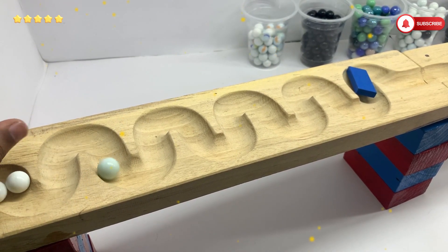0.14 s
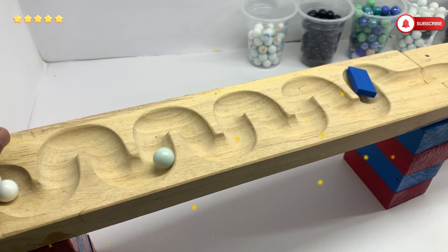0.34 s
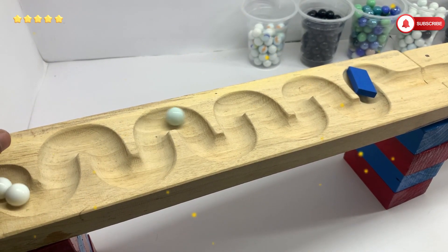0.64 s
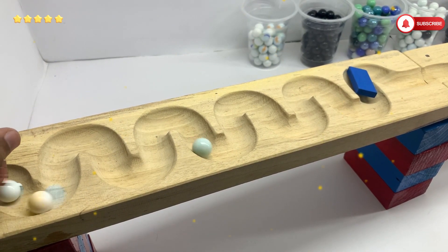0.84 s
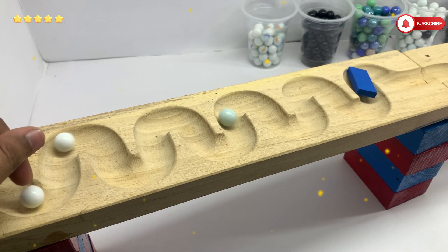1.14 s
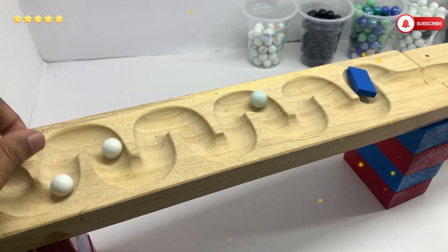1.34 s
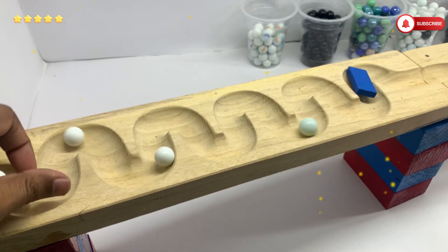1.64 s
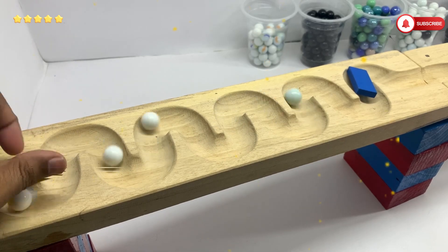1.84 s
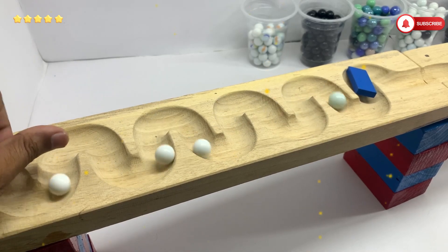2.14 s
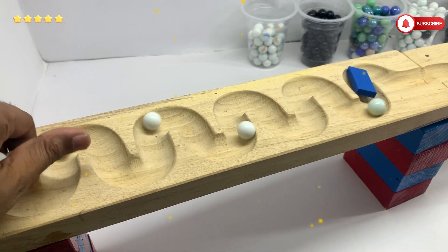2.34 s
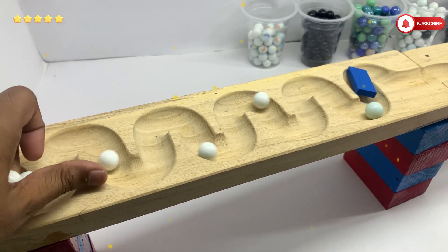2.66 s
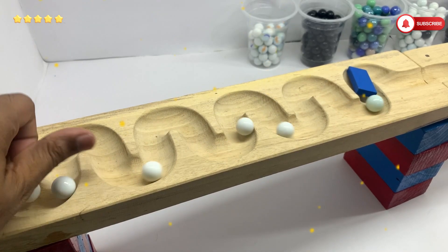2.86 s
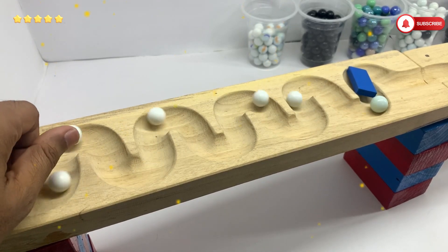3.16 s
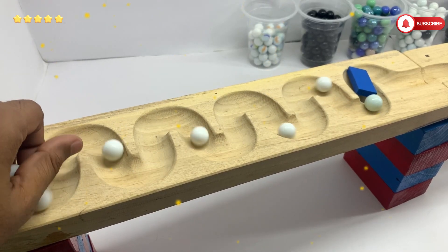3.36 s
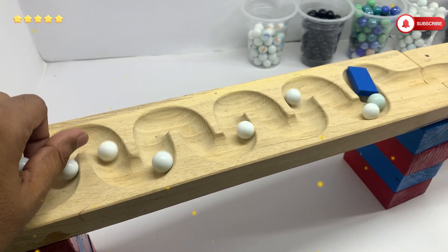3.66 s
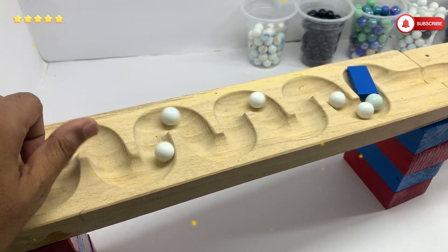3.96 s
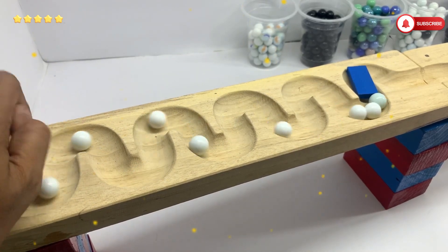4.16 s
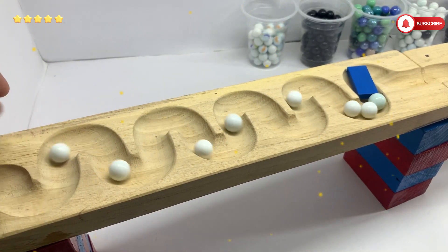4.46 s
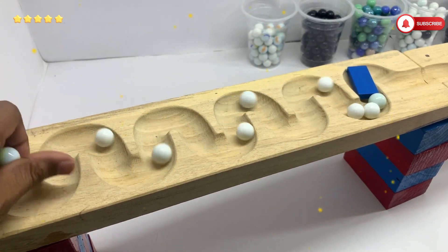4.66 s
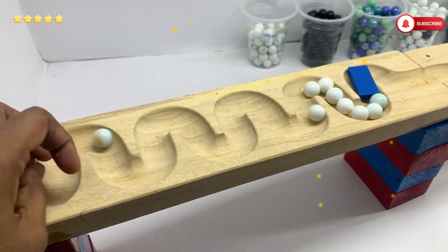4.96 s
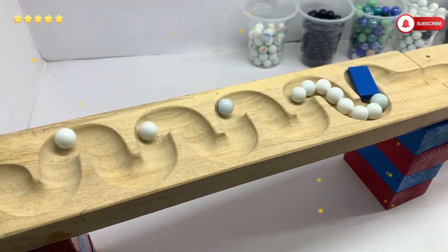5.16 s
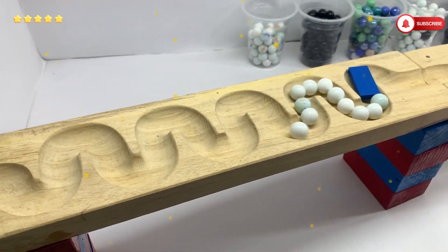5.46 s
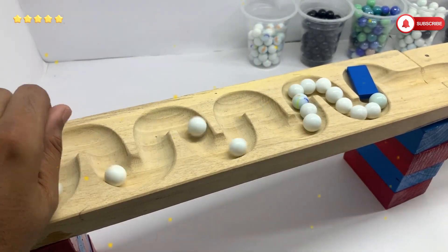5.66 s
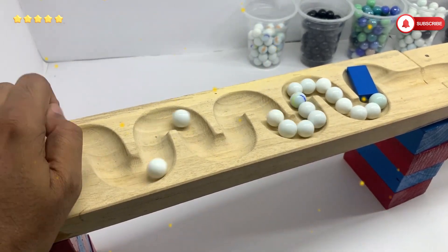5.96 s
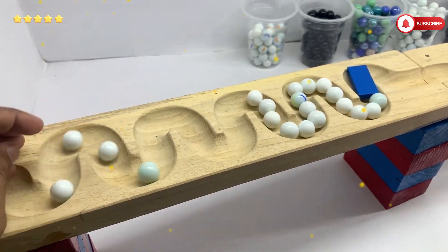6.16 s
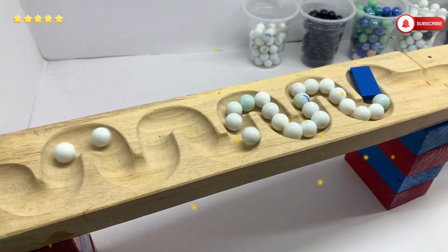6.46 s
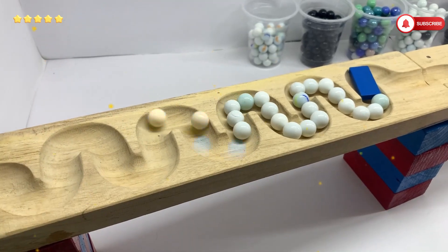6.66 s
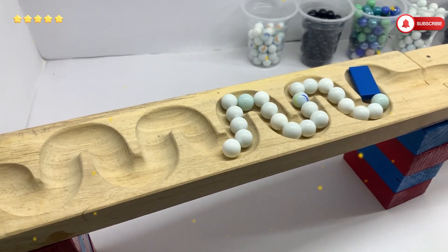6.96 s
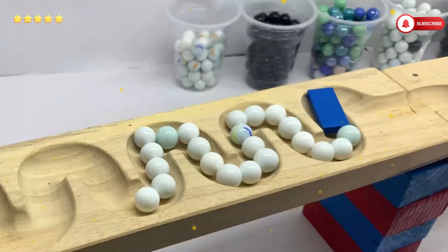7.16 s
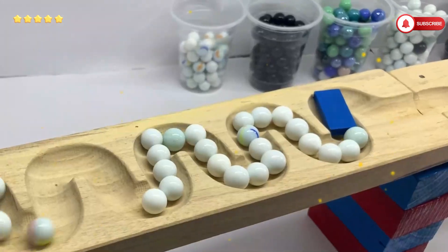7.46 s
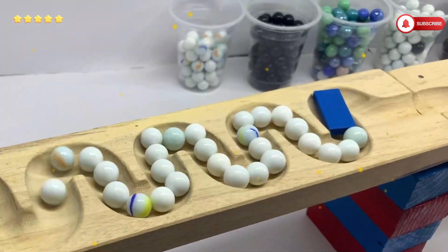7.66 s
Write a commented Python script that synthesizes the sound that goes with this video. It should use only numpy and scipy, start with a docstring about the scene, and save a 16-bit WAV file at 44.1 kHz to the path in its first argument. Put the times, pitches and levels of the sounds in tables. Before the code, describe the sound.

Close up in a small, quiet room, marbles rumble and chatter over wood, knocking against the turns of a groove. Now and then one drops with a crack and tiny bounces, or glass clacks on glass. Then the rumble gives way to a packed row of marbles jostling in short waves, full of crisp clicks and dry taps, as further marbles roll in with a swelling hollow tone.

```python
"""A wooden rumble with knocks and glassy clacks gives way to bright clicks and surges of rattling.
Glass marbles roll down a winding groove in a wooden board, close by in a small room. The board
rumbles under them and rings when they hit a bend or drop onto it; now and then glass hits glass.
Then the marbles crowd together and jostle, while more roll up to the row with a hollow ring."""
import sys
import numpy as np
from scipy import signal
from scipy.fft import rfft, irfft
from scipy.io import wavfile
from scipy.ndimage import uniform_filter1d

SR = 44100
rng = np.random.default_rng(int(sys.argv[2]) if len(sys.argv) > 2 else 0)


def wav_out(sig):
    """Save sig, one row per channel (or a flat mono array), as 16-bit PCM at SR to the path in sys.argv[1]."""
    wavfile.write(sys.argv[1], SR, np.round(np.clip(np.atleast_2d(sig).T, -1, 1) * 32767).astype(np.int16))


N = 344348
T = np.arange(N) / SR
SIZE = 16384  # samples in one short sound
FREQS = np.maximum(np.arange(SIZE // 2 + 1) * SR / SIZE, 1)
SIDES = np.array([[1], [-1]])  # adds on the left, subtracts on the right
CROWD_START_S = 4.722

# stereo width on the slope and in the crowd: (frequency [Hz], side minus middle [dB])
SLOPE_WIDTH = [(60, -19), (180, -35), (380, -11.5), (700, -7.5), (1290, 1), (4400, -0.5), (15000, 3)]
CROWD_WIDTH = [(100, -2), (250, -21), (1200, -19), (2400, -6.5), (4400, -2.5), (8100, 3), (14000, -2.5)]
# tone of rolling in the crowd: (frequency [Hz], level [dB])
CROWD_ROLL_TONE = [(30, -43), (130, -14), (190, -11.5), (270, 9), (420, 5.5), (620, -4), (850, 3.5),
                   (1300, -21.5), (4000, -40)]


def undb(db):
    """Turn decibels into a gain to multiply by."""
    return 10 ** (np.asarray(db) / 20)


def fade(t, t60):
    """Die away by 60 dB every t60 seconds."""
    return undb(-60 * t / t60)


def swell(start, stop, attack_s, release_s):
    """Rise from the start, hold, then fall after the stop."""
    return np.clip((T - start) / attack_s, 0, 1) * np.clip(1 - (T - stop) / release_s, 0, 1)


def follow(level, growth):
    """Gain of a layer that grows by `growth` dB for each dB of the level it follows."""
    usual = undb(-16.5)
    return usual * (level / usual) ** growth


def steady(x):
    """Hold the power near 1, so that the level can be set afterwards."""
    power = uniform_filter1d(x.mean(axis=0) ** 2, size=3200)
    return x / np.sqrt(np.abs(power) + 1e-12)


def curve(points):
    """Join (frequency [Hz], level [dB]) points into a gain for every frequency."""
    hz, db = np.transpose(points)
    return undb(np.interp(np.log(FREQS), np.log(hz), db))


def resonances(modes, base=0):
    """Left and right gain of an object's modes (the pitches it rings at) on top of a broad base."""
    power = sum(undb(db + SIDES * pan / 2) ** 2 / (1 + (2 * (FREQS - hz) / width) ** 2)
                for hz, width, db, pan in modes)
    return np.sqrt(power + base ** 2)


def colour(x, gain):
    """Filter a sound so that each hit starts sharply and then rings out (minimum phase)."""
    cepstrum = irfft(np.log(np.atleast_2d(gain) + 1e-9))
    cepstrum[:, 1:SIZE // 2] *= 2
    cepstrum[:, SIZE // 2 + 1:] = 0
    impulse = irfft(np.exp(rfft(cepstrum)))[:, :SIZE // 2]
    return signal.fftconvolve(x, impulse, axes=1)[:, :x.shape[1]]


def stereo_noise(width):
    """Hiss whose left and right differ as much as the width table says."""
    return rng.standard_normal(N) + SIDES * colour(rng.standard_normal((1, N)), curve(width))


def add(out, time_s, x):
    """Mix a short sound in at a given time."""
    i = max(int(time_s * SR), 0)
    out[:, i:i + x.shape[1]] += x[:, :N - i]


def impacts(width, gain, per_s, spread_db, t60):
    """A stream of tiny random hits of unequal size, sounding through an object."""
    chance, size = rng.random(N), np.minimum(rng.standard_normal(N), 2)
    kicks = (chance < per_s / SR) * undb(spread_db * size) ** 2
    energy = signal.lfilter([1], [1, -fade(1 / SR, t60) ** 2], kicks)
    return steady(colour(stereo_noise(width) * np.sqrt(energy), gain))


def blows(hits, width, gain, ring_db, ring_width_hz, rise_s, t60, tail_db, tail_t60):
    """Single hits: each is a burst of noise with a tail, and the spot struck favours one pitch."""
    out, noise, t = np.zeros((2, N)), stereo_noise(width), T[:SIZE]
    rise = 1 - np.exp(-(t / rise_s) ** 2)
    shape = rise * (fade(t, t60) + undb(tail_db) * fade(t, tail_t60))
    for (time_s, db, hz), start in zip(hits, rng.integers(N - SIZE, size=len(hits))):
        body = gain * resonances([(hz, ring_width_hz, ring_db, 0)], base=1)
        hit = colour(noise[:, start:start + SIZE] * shape, body)
        add(out, time_s, undb(db) * hit / np.abs(hit.mean(axis=0)).max())
    return out


def tinkle(gain, low_hz, high_hz, spread_db, t60, width, count, pitches=9):
    """Many small collisions in the crowd, each ringing briefly at a few pitches of its own."""
    out, t = np.zeros((2, N)), T[:SIZE // 24]
    decay = fade(t, t60)
    times = rng.uniform(CROWD_START_S, T[-1], count)
    sizes = undb(spread_db * np.minimum(rng.standard_normal(count), 2))
    rings_hz = rng.uniform(low_hz, high_hz, (count, pitches))
    middles, sides = rng.uniform(-1, 1, (2, count, pitches))
    for time_s, size, hz, middle, side in zip(times, sizes, rings_hz, middles, sides):
        tones = np.sin(2 * np.pi * np.outer(hz, t))
        ping = middle @ tones + SIDES * width * (side @ tones)
        add(out, time_s, size * ping * decay)
    return steady(colour(out, gain))


def wooden_board():
    """The board rings at a few clear pitches above many that die quickly and blur together."""
    # clear rings: (pitch [Hz], width [Hz], level [dB], left minus right [dB])
    modes = [(54, 16, 6, -8), (91.1, 5, 15.5, -0.5), (163, 22.8, 15, -0.5), (252, 30, 10, -2),
             (346.4, 34, 5, 15), (507, 100, 8.5, -3.5), (835, 27.6, 14.5, 5.5), (963, 25, 13, 3),
             (1205, 19, 11, 5.5), (1553.4, 22.5, 18, 0), (1978, 75, 10.5, 8), (1942, 34, 10.5, -2),
             (2180, 14.3, 17, -4), (2344, 76, 9, 5), (2547, 10.6, 12.5, 6), (2933, 33, 8, -3),
             (3260, 46, 4.5, -2), (3784, 59, 1, -6.5), (4050, 9.4, 4, -20.5), (5110, 53, 5, -12)]
    # the blur: (frequency [Hz], level [dB])
    wood_tone = [(25, -24), (50, -35), (300, 3.5), (600, 7), (720, -2.5), (1400, 8), (2400, -3.5),
                 (3000, -3), (6000, -2.5), (10000, -20.5), (16000, -32)]
    return resonances(modes, curve(wood_tone))


def packed_glass():
    """Marbles packed together ring high in the treble."""
    # bright rings: (pitch [Hz], width [Hz], level [dB], left minus right [dB])
    modes = [(4800, 580, 0, 3), (8700, 200, 1.5, 2), (10470, 280, 3.5, 2), (11950, 160, 3, 15.5),
             (12720, 250, 6, -5), (14240, 370, 4.5, 6)]
    # broad tone of a click: (frequency [Hz], level [dB])
    click_tone = [(200, -20), (700, -12), (1800, -1.5), (3200, -2), (4600, -34), (6500, -3), (9500, -2),
                  (13000, -7.5), (16000, -1.5)]
    return resonances(modes, curve(click_tone))


def room_tone():
    """The faint, even hiss of the room."""
    # (frequency [Hz], level [dB])
    hiss_tone = [(30, -13), (120, -30), (400, -22), (1500, 2), (12000, -7)]
    return undb(-51) * steady(colour(stereo_noise(CROWD_WIDTH), curve(hiss_tone)))


def room_echo(x, t60, gap_s):
    """The walls send back a blur of reflections after a short gap."""
    t = T[:SIZE]
    tail = rng.standard_normal((2, SIZE)) * fade(t, t60) * (t > gap_s)
    tail /= np.sqrt(np.sum(tail ** 2) / 2)
    return signal.fftconvolve(x, tail, axes=1)[:, :N]


def taps():
    """Dry taps with a hint of pitch in the crowd, and one soft bump."""
    # (time [s], level [dB], pitch [Hz])
    tap_hits = [(4.916, -2.5, 1610), (4.948, -5.5, 1580), (4.967, -14, 890), (5.106, -3.5, 2290),
                (5.243, -4.5, 2080), (5.279, -3, 3410), (5.406, -4, 3660), (6.237, -7, 1990),
                (6.447, -2, 4150), (6.448, -9.5, 4320), (6.481, -5, 3550), (6.505, -6, 4100),
                (6.522, -5.5, 4200), (7.039, -12, 2430), (7.166, -13, 1820), (7.287, -13, 2790),
                (7.347, -16, 2800), (7.751, -6, 1890)]
    bump_hits = [(6.749, -15.5, 286)]
    # (frequency [Hz], level [dB])
    tap_tone = [(150, -21), (600, -6), (1500, -7.5), (3500, -6.5), (5000, -13.5), (12000, -14.5)]
    bump_tone = [(80, -33), (220, 1), (400, 3), (800, -12), (4000, -40)]
    hard = blows(tap_hits, CROWD_WIDTH, curve(tap_tone), ring_db=15, ring_width_hz=450,
                 rise_s=0.0008, t60=0.012, tail_db=-15, tail_t60=0.06)
    soft = blows(bump_hits, CROWD_WIDTH, curve(bump_tone), ring_db=25, ring_width_hz=54,
                 rise_s=0.0034, t60=0.019, tail_db=-19, tail_t60=0.13)
    return undb(2) * hard + soft


def hollow_runs():
    """A marble grows louder as it speeds up, ringing hollow until the row stops it."""
    # (start [s], stop [s], final level [dB], lowest pitch [Hz])
    runs = [(5.047, 5.505, -28.5, 570), (5.62, 6.097, -34.5, 490), (6.17, 6.32, -30, 484),
            (6.323, 6.735, -28.5, 493.6), (6.775, 7.072, -21.5, 486.6), (7.221, 7.806, -26.5, 497.6)]
    # the ring, retuned for each run: (pitch [Hz], width [Hz], level [dB], left minus right [dB])
    hollow = [(486, 1.5, 10.5, -1.5), (650, 20, -22.5, 1), (1510, 43, -15.5, -4), (1750, 32, -23, 4)]
    out, growth_db = np.zeros((2, N)), 13.5
    roll = impacts(CROWD_WIDTH, curve(CROWD_ROLL_TONE), per_s=490, spread_db=3, t60=0.012)
    noise = stereo_noise(CROWD_WIDTH)
    attack_s, release_s = 0.027, 0.019
    for start, stop, db, ring_hz in runs:
        now = (T > start) & (T < stop + release_s)
        modes = [(hz * ring_hz / hollow[0][0], *rest) for hz, *rest in hollow]
        ring = steady(colour(noise[:, now], resonances(modes)))
        still_to_go = np.maximum((stop - T[now]) / (stop - start), 0)
        level = undb(db - growth_db * still_to_go) * swell(start, stop, attack_s, release_s)[now]
        out[:, now] += level * (undb(1.5) * ring + undb(-3.5) * roll[:, now])
    return out


def crowd(glass):
    """Many marbles shift together: with each surge they jostle, rattle and roll."""
    # (start [s], stop [s], level [dB])
    surges = [(4.74, 4.864, -26), (5.058, 5.196, -26.5), (5.15, 5.506, -21.5), (5.44, 5.508, -26),
              (5.648, 5.742, -29), (5.737, 5.823, -22.5), (5.888, 5.962, -25), (6.012, 6.1, -28),
              (6.14, 6.303, -22.5), (6.32, 6.48, -26), (6.458, 6.713, -23.5), (6.738, 7.08, -36.5),
              (7.1, 7.163, -29.5), (7.228, 7.307, -27), (7.408, 7.629, -20.5), (7.616, 7.718, -23)]
    # (frequency [Hz], level [dB])
    jostle_tone = [(200, -33.5), (600, 1.5), (1000, 0.5), (1250, -1.5), (2200, -2), (3400, 1.5), (4000, -5),
                   (4700, -3), (6500, -9.5), (12000, -9.5)]
    stir = undb(np.where(T < 6.72, -35.5, -47))  # the row stirs between surges, then settles
    swells = [undb(db) * swell(start, stop, attack_s=0.068, release_s=0.024)
              for start, stop, db in surges]
    motion = np.linalg.norm([stir, *swells], axis=0)
    jostle = tinkle(curve(jostle_tone), low_hz=500, high_hz=9000,
                    spread_db=1.5, t60=0.028, width=0.5, count=2800)
    rattle = tinkle(glass, low_hz=5000, high_hz=16000, spread_db=4, t60=0.02, width=0.6, count=1900)
    roll = impacts(CROWD_WIDTH, curve(CROWD_ROLL_TONE), per_s=540, spread_db=1.5, t60=0.0035)
    out = motion * (undb(2.4) * jostle + undb(-9) * roll)
    out += undb(-1.5) * follow(motion, growth=0.97) * rattle
    return out * np.clip((T - CROWD_START_S) / 0.0027, 0, 1)


def clicks(glass):
    """Single marbles snap against the packed row, each at a pitch of its own."""
    # (time [s], level [dB])
    snaps = [(4.7172, -0.5), (4.7252, -9), (4.7374, -7), (4.8275, -3), (4.8417, -0.5), (5.0063, -16),
             (5.0067, -2.5), (5.0164, -5.5), (5.1577, -8), (5.1778, -3), (5.1937, -1), (5.3418, -10),
             (5.4313, 0), (5.461, -9), (5.5304, -0.5), (5.5971, -3), (5.6272, -2), (5.657, -3), (5.692, -2),
             (5.7264, 0), (5.7893, -1), (5.8214, -7), (5.8378, -4), (5.8536, -1), (5.9172, -4.5),
             (5.9592, -1.5), (5.9661, -5.5), (5.9714, -6), (5.9892, -5), (6.004, -7), (6.077, -1.5),
             (6.099, -1), (6.123, -3), (6.2802, -4), (6.328, -2), (6.3403, -3), (6.384, 2.5), (6.4138, -2),
             (6.4822, -3), (6.569, -13), (6.6493, -2), (6.6863, -1), (6.7, -9), (6.716, -1.5),
             (6.8114, -13), (6.8782, -3.5), (7.0798, 0), (7.1223, -0.5), (7.139, -6), (7.157, 0),
             (7.1673, -2), (7.2095, 0), (7.2507, 0), (7.285, -4), (7.2963, -1.5), (7.3472, -2), (7.373, -3),
             (7.3814, -3.5), (7.624, -3), (7.677, -5), (7.7114, -7)]
    hits = [(time_s, db, rng.uniform(10620, 14200)) for time_s, db in snaps]  # pitch in Hz
    return undb(-0.5) * blows(hits, CROWD_WIDTH, glass, ring_db=12, ring_width_hz=300,
                              rise_s=0.002, t60=0.0095, tail_db=-26, tail_t60=0.08)


def clacks():
    """Glass meets glass on the slope: a very short touch, so nearly all treble."""
    # (time [s], level [dB], pitch [Hz])
    hits = [(0.0195, -10.5, 8500), (0.1202, -13.5, 6750), (0.292, -5.5, 8800), (0.3, -4, 8440),
            (0.438, -13.5, 8500), (0.513, -17, 5360), (0.5418, -9.5, 8700), (0.6476, -19, 8560),
            (1.2303, -19.5, 6240), (1.5889, -12, 4700), (1.604, -8.5, 5010), (1.813, -24, 5400),
            (2.169, -24, 5400), (2.4007, -21, 9100), (2.6563, -10, 5800), (2.7537, -13, 5030),
            (2.7952, -7, 5800), (2.8014, -9, 5030), (2.8536, -14.5, 5850), (2.9168, -11.5, 5000),
            (3.236, -10, 9000), (3.3094, -11, 5660), (3.3257, -8, 9050), (3.6678, -10, 8700),
            (3.7077, -11, 8800), (4.0095, -14, 8800), (4.0247, -12, 4970), (4.0982, -7, 9000),
            (4.4692, -11, 9100), (4.5346, -21, 8500)]
    # (frequency [Hz], level [dB])
    tone = [(800, -86), (2500, -6), (4500, 1), (6500, 2), (8200, -3.5), (9500, 5), (10500, -7), (12200, -8),
            (15500, -23)]
    return undb(2) * blows(hits, SLOPE_WIDTH, curve(tone), ring_db=8, ring_width_hz=900,
                           rise_s=0.0007, t60=0.014, tail_db=-13, tail_t60=0.13)


def drops(board):
    """A falling marble hits the board hard: a bright crack, then tiny bounces that die away."""
    # (time [s], level [dB], pitch [Hz])
    hits = [(0.0476, -3, 1860), (0.0884, -2, 1950), (1.6038, -1.5, 1950), (1.6841, -1.5, 2050),
            (1.7255, -12, 1980), (1.7746, -6.5, 2050), (2.7519, -2, 1900), (2.8085, -4, 1870),
            (2.843, -3.5, 2210), (2.9173, -2, 1980), (3.3678, -0.5, 2120), (4.024, -3, 4960),
            (4.0744, -10, 1940)]
    # tone of the drop, and how the bounces dull it: (frequency [Hz], level [dB])
    tone = [(100, -30), (700, -30), (1400, -14.5), (2000, -1.5), (3200, 5.5), (5000, -3.5), (7000, -15.5),
            (15000, -47)]
    dulling = [(2500, 1.5), (4000, -8.5), (7000, -15.5)]
    body = board * curve(tone)
    cracks = blows(hits, SLOPE_WIDTH, body, ring_db=8.5, ring_width_hz=260,
                   rise_s=0.0011, t60=0.023, tail_db=-15.5, tail_t60=0.52)
    fades = [undb(db - 23) * (T > time_s) * fade(np.abs(T - time_s), t60=0.71) for time_s, db, _ in hits]
    bounces = impacts(SLOPE_WIDTH, body * curve(dulling), per_s=600, spread_db=8, t60=0.013)
    return undb(-1) * cracks + np.linalg.norm(fades, axis=0) * bounces


def knocks(board):
    """Marbles glance off the bends of the groove and the wood gives a hollow ring."""
    # (time [s], level [dB], pitch [Hz])
    hits = [(0.268, -5.5, 1960), (0.403, -19, 1960), (0.46, -9.5, 2100), (0.514, -11, 2450),
            (0.69, -12.5, 1290), (0.759, -4.5, 2510), (1.009, -4.5, 2130), (1.096, -11.5, 1550),
            (1.316, -6.5, 2200), (1.348, -5.5, 2010), (1.419, -1.5, 2160), (1.574, -9, 1800),
            (1.836, -5.5, 2190), (1.942, -8.5, 1460), (2.043, -3.5, 1500), (2.109, -10, 1980),
            (2.194, -10.5, 2220), (2.3, -8, 1880), (2.386, -3, 2470), (2.541, -3, 2560),
            (2.627, -6.5, 2200), (2.733, -3, 2130), (3.302, -3.5, 2520), (3.589, -4, 2030),
            (3.645, -8.5, 2220), (3.881, -6.5, 2000), (3.935, -2, 1940), (3.965, -3.5, 2430),
            (4.27, -6, 2210), (4.348, -2.5, 2520), (4.397, -1.5, 2250), (4.423, -5, 2000),
            (4.603, -8, 2010), (4.674, -5.5, 1870)]
    # (frequency [Hz], level [dB])
    tone = [(100, -18), (700, -10), (1400, -5), (2000, 0), (2700, 1), (3500, -9), (6000, -19), (15000, -26)]
    return undb(-0.8) * blows(hits, SLOPE_WIDTH, board * curve(tone), ring_db=11, ring_width_hz=130,
                              rise_s=0.0008, t60=0.046, tail_db=-24, tail_t60=0.12)


def rolling(board):
    """Marbles ride over the wood grain and make the board rumble, grind and chatter."""
    # level of the rolling sound over time, with brief dips at loud clacks and drops: (time [s], level [dB])
    level_points = [(0.0, -24), (0.16, -27), (0.28, -17.5), (0.31, -26.5), (0.5, -16.5), (0.6, -29),
                    (0.64, -18), (1.0, -16), (1.05, -18.5), (1.18, -15), (1.34, -16.5), (1.59, -16.5),
                    (1.63, -26.5), (1.77, -17.5), (2.3, -14), (2.35, -16.5), (2.69, -13.5), (2.8, -25.5),
                    (3.23, -12), (3.42, -20), (3.54, -12.5), (3.67, -15.5), (3.69, -35.5), (3.75, -20),
                    (3.86, -14.5), (4.1, -24), (4.31, -12), (4.51, -21.5), (4.61, -12.5), (4.72, -15)]
    # push of soft bumps, fine grain and hard hits: (frequency [Hz], level [dB])
    soft = [(25, -20), (50, -0.5), (260, 0.5), (400, -6.5), (700, -12), (2000, -59.5)]
    grain = [(120, -45), (300, -10), (450, 2.5), (1300, -2), (1800, -12), (3000, -24.5), (8000, -87)]
    hard = [(400, -9), (1100, -6), (1600, 4.5), (2600, 3.5), (3500, -3), (6000, -24), (9500, 2),
            (15000, -28)]
    rumble = impacts(SLOPE_WIDTH, board * curve(soft), per_s=400, spread_db=-0.5, t60=0.023)
    grind = impacts(SLOPE_WIDTH, board * curve(grain), per_s=400, spread_db=5, t60=0.016)
    chatter = impacts(SLOPE_WIDTH, board * curve(hard), per_s=600, spread_db=6.5, t60=0.024)
    rolling_level = undb(np.interp(T, *np.transpose(level_points)))
    thinning = undb(1.03 - 1.06 * T)  # less rumble as the groove fills
    alone = np.clip(1 - (T / 1.3) ** 4, 0, 1)  # one marble chatters less; by 1.3 s there are several
    out = thinning * follow(rolling_level, growth=1.45) * rumble
    out += rolling_level * (undb(-3.5) * grind + undb(-10 - 7 * alone) * chatter)
    return out * np.clip((CROWD_START_S - T) / 0.012, 0, 1)


def scene():
    """The run down the slope, then the crowd, over faint room tone."""
    board, glass = wooden_board(), packed_glass()
    hits = knocks(board) + drops(board) + clacks()
    air = room_tone()
    on_slope = rolling(board) + hits + undb(-11.5) * room_echo(hits, t60=0.32, gap_s=0.0037)
    in_crowd = crowd(glass) + hollow_runs() + clicks(glass) + taps()
    return air + on_slope + in_crowd


def record(dry):
    """Clip the loudest peaks and cut the treble above 15850 Hz."""
    low_pass = signal.ellip(10, 0.2, 70, 15850, fs=SR, output="sos")
    return signal.sosfilt(low_pass, np.clip(dry, -1, 1))


dry = scene()
out = record(dry)
wav_out(out)
```